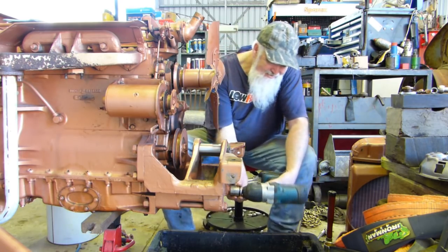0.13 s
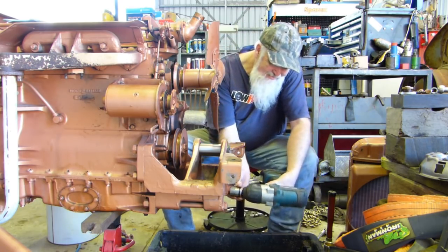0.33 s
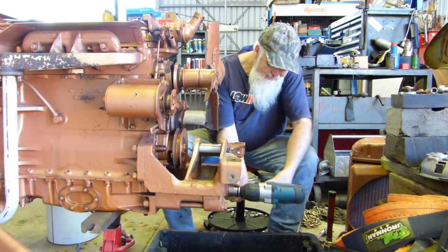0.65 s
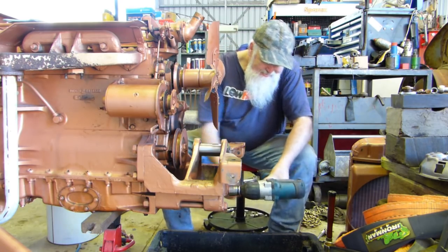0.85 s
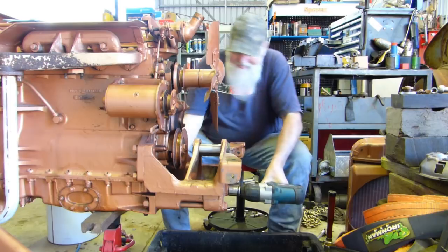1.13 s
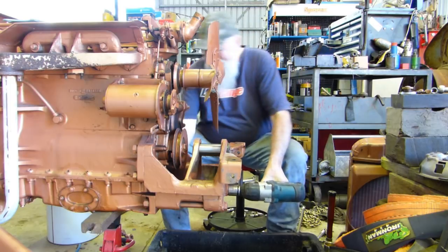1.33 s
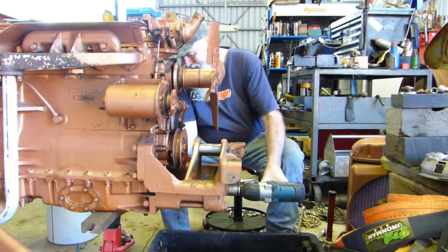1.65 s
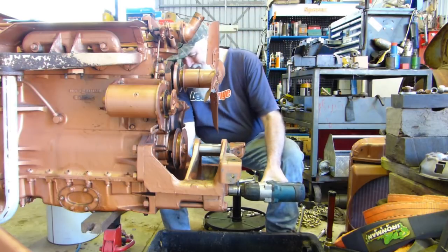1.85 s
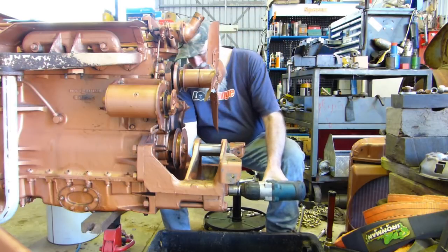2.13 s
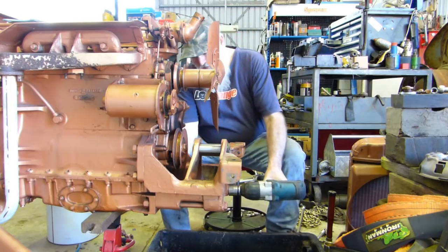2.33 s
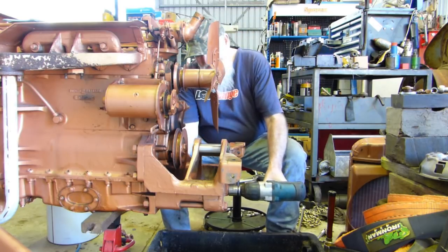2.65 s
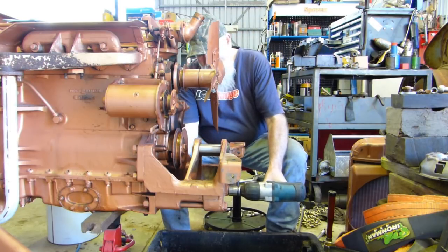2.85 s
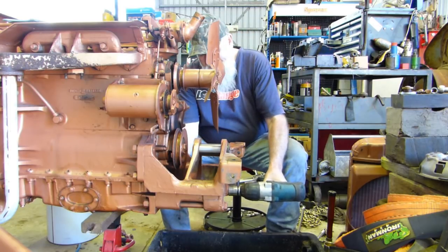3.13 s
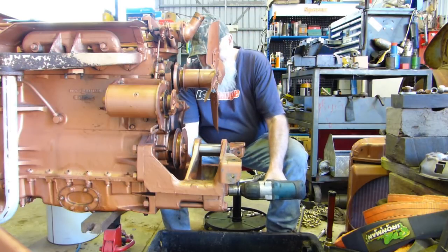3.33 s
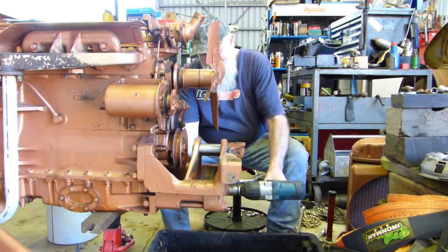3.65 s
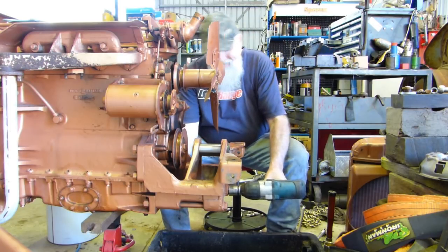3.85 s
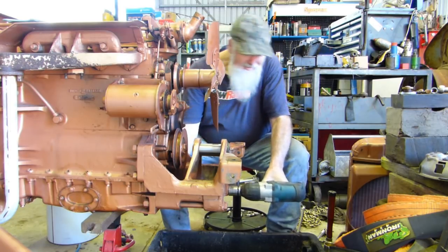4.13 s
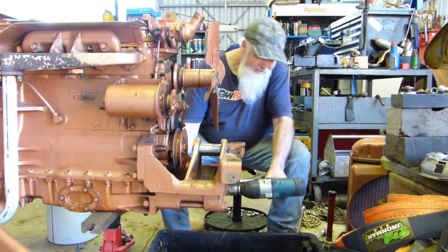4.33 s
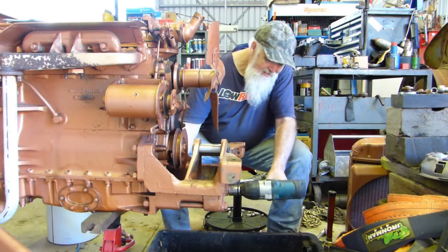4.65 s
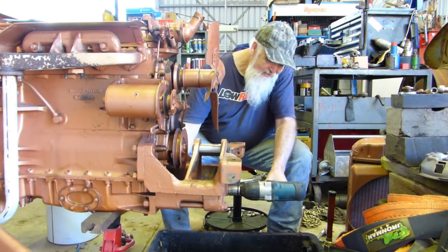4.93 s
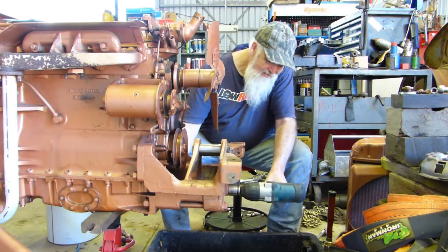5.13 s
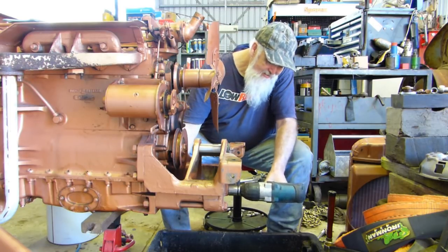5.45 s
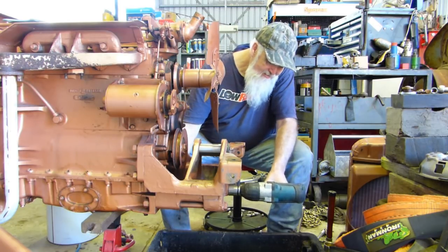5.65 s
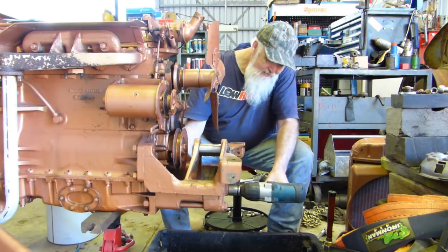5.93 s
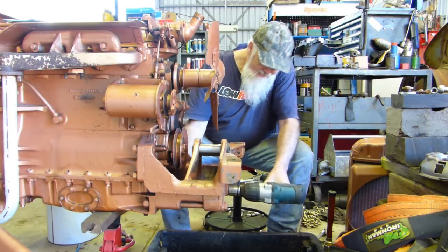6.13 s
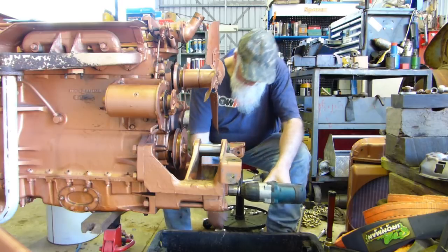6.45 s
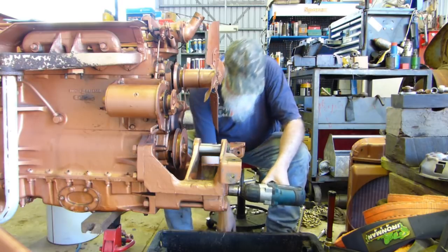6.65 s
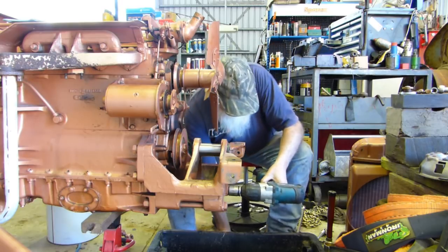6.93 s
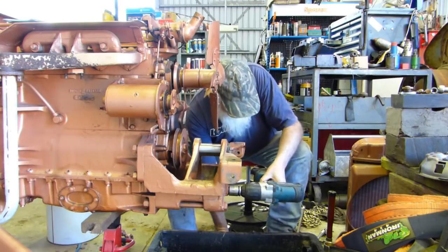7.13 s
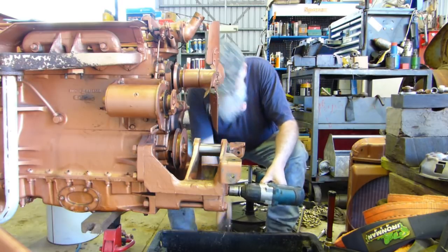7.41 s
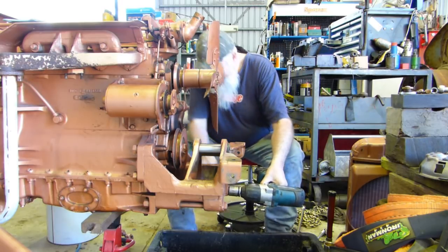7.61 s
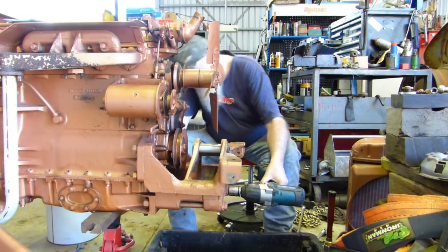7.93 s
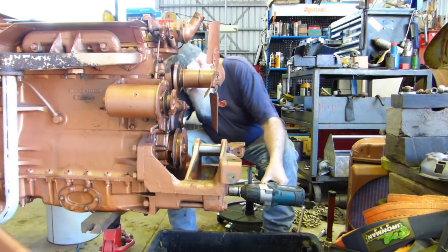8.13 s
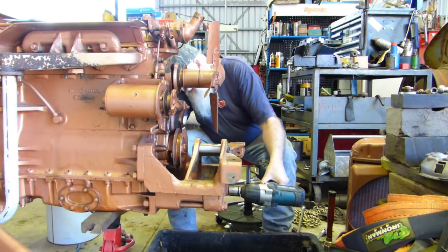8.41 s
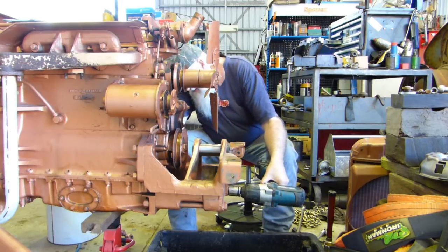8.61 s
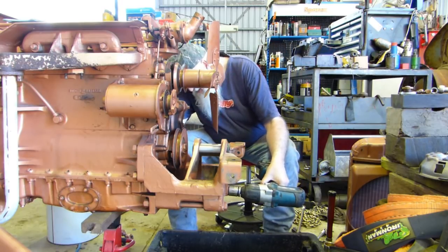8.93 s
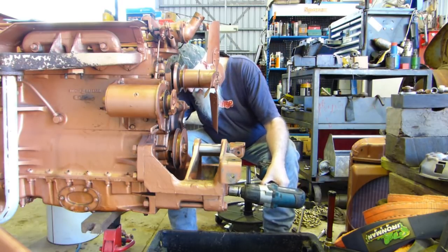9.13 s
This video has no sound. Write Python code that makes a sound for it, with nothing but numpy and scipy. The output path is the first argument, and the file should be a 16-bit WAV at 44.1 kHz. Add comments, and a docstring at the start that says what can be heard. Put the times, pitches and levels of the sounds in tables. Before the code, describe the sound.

Close stereo microphone, slightly clipped by the loudest blows, in a reverberant metal shed. Quiet creaking, rustling and small ticks come first, with a double knock on a heavy casting. A wrench trigger clicks and rapid metallic blows hammer over gear noise, with a brief hitch, then grow uneven and die. Quiet air follows, with barely audible creaks and finally two separate clinks of a steel bar.

```python
"""An impact wrench hammers at a tight bolt in a cast-iron block inside a sheet-metal shed, falters and stops:
each blow is a crack of banded noise that rings the modes of socket and block, over a bed of gear noise.
Before it a seat creaks in uneven slips, a tool knocks on the casting and clothes shuffle in noise swells;
after it the seat creaks again, a steel bar is clinked twice, a small part rings and something hollow is bumped.
Hum sines and noisy background air lie underneath; they sink when the hammering starts and creep back."""
import sys
import numpy as np
from scipy import signal
from scipy.fft import rfft, irfft
from scipy.io import wavfile
from scipy.ndimage import uniform_filter1d

SR = 44100
rng = np.random.default_rng(int(sys.argv[2]) if len(sys.argv) > 2 else 0)


def unload_wav(signal):
    """Save mono or channel-first audio to the path in sys.argv[1] as 16-bit WAV at rate SR, clipped to [-1, 1]."""
    wavfile.write(
        sys.argv[1],
        SR,
        np.round(np.clip(np.atleast_2d(signal).T, -1, 1) * 32767).astype(np.int16),
    )


N = 409248


def from_db(db):
    """Gain of a level."""
    return 10 ** (np.asarray(db) / 20)


def rms_one(x):
    """Scale to rms 1."""
    return x / np.sqrt(np.mean(x ** 2) + 1e-20)


def in_time(rows, column=1):
    """One column of a curve at every sample; near silence outside its span."""
    rows = np.array(rows)
    return np.interp(np.arange(N) / SR, rows[:, 0], rows[:, column], left=-150, right=-150)


def at_hz(points, hz):
    """Read a table on a log-frequency axis."""
    points = np.array(points)
    return np.interp(np.log(hz), np.log(points[:, 0]), points[:, 1])


def force_db(events, hz, middle_hz):
    """Strength of each event at one pitch: middle level up to middle_hz, treble level from an octave above."""
    events = np.array(events)
    treble = np.clip(np.log2(hz / middle_hz), 0, 1)
    return treble * events[:, 1] + (1 - treble) * events[:, 2]


def train(times, sizes):
    """Clicks of given sizes at given times."""
    clicks = np.full(N, 1e-18)
    clicks[(np.asarray(times) * SR).astype(int)] = sizes
    return clicks


def ring(clicks, hz, t60):
    """A two-pole resonator: a unit click sets a decaying sine of starting height 1 ringing."""
    radius, angle = from_db(-60 / (t60 * SR)), 2 * np.pi * hz / SR
    return signal.lfilter([0, np.sin(angle)], [1, -2 * radius * np.cos(angle), radius * radius], clicks)


T60_TIMES_WIDTH = np.log(1000) / np.pi   # a resonance's t60 in s times its width in Hz
BAND_EDGES_HZ = 25 * 2 ** (np.arange(29) / 3)


def bands(length):
    """Third-octave bands of noise as (centre Hz, mid, side); neighbours are unrelated."""
    white = rng.standard_normal((2, 2, length))
    for k, (low, high) in enumerate(zip(BAND_EDGES_HZ, BAND_EDGES_HZ[1:])):
        band = signal.butter(2, [low, high], "band", fs=SR, output="sos")
        mid, side = signal.sosfilt(band, white[k % 2])
        yield np.sqrt(low * high), mid, side


def spread(hz, mid, side, likeness):
    """Left and right of a band, from mid and side weighted by how alike the two channels are."""
    alike = np.clip(at_hz(likeness, hz), 0, 1)
    return np.sqrt(1 + alike) * mid + np.sqrt(1 - alike) * side * [[1], [-1]]


def bursts(kinds, t60s, hz, vary_db, rise_s):
    """Envelope of one band: every event rises fast and dies, with a colour of its own."""
    clicks = 0
    for events, colour in kinds:
        level_db = force_db(events, hz, 2237) + at_hz(colour, hz) + rng.normal(0, vary_db, len(events))
        clicks = clicks + train(np.array(events)[:, 0], from_db(level_db))
    fall = from_db(-60 / (at_hz(t60s, hz) * SR))
    rise = np.exp(-1 / (rise_s * SR))
    return signal.lfilter([1 - rise], np.convolve([1, -fall], [1, -rise]), clicks)


CONTACT_S = 0.0022   # a ring builds up while the parts touch


def struck(events, modes, level_db):
    """Each blow sets every mode ringing; the ring wavers irregularly in level."""
    s = np.array(events)[:, 0]
    out, span = np.zeros(N), slice(int(s[0] * SR), int((s[-1] + 1) * SR))
    for hz, *mode_db, t60 in modes:
        sizes_db = force_db(events, hz, 920) + level_db + np.array(mode_db)
        sizes_db = sizes_db + rng.normal(0, 0.4, len(events))
        clicks = train(s, from_db(sizes_db))[span]
        step = np.arange(len(clicks)) / 220   # a fresh waver level every 220 samples
        levels = rng.normal(0, min(hz / 400, 6), int(np.ceil(step[-1] + 2)))
        waver_db = np.interp(step, np.arange(step[-1] + 2), levels)
        build_up = ring(clicks, hz, min(t60 / 2, np.log(1000) * CONTACT_S))
        out[span] += (ring(clicks, hz, t60) - build_up) * from_db(waver_db)
    return out


def swells(rows):
    """Gain of sounds that rise to a top and fade, in straight lines of dB."""
    t = np.arange(0, N / SR + .001, .0005)
    gain = sum(from_db(db - np.where(t < s, rise * (s - t), fall * (t - s))) for s, db, rise, fall in rows)
    return np.interp(np.arange(N) / SR, t, gain)


MOTOR_ON_S, MOTOR_OFF_S, GEARS_DB = 2.225, 6.25, -40.5   # gears' level before colour
RUN_UP_DB, RUN_UP_S, RUN_DOWN_DB_PER_S = -10.5, 0.11, 370


def motor():
    """Gain of the gear noise between the blows: on at the switch, up to speed, running down at the end."""
    t = np.arange(N) / SR
    run_up_db = RUN_UP_DB * np.exp(-np.abs(t - MOTOR_ON_S) / RUN_UP_S)
    run_down_db = RUN_DOWN_DB_PER_S * np.maximum(t - MOTOR_OFF_S, 0)
    return from_db(GEARS_DB + run_up_db - run_down_db) * (t > MOTOR_ON_S)


# hammer on anvil, one run of blows that falters twice: start_s, treble_db, middle_db (before colour)
BLOWS = [(2.2523, -2.5, -15.5), (2.2911, -3, -20), (2.3231, -7.5, -17.5), (2.3541, -11.5, -27.5),
         (2.383, -9, -17.5), (2.413, -9.5, -20.5), (2.4425, -8.5, -26.5), (2.472, -8, -18),
         (2.5022, -7, -27.5), (2.5313, -9.5, -32.5), (2.5612, -10, -23), (2.591, -7.5, -22.5),
         (2.621, -9, -21.5), (2.6515, -10.5, -19), (2.6814, -6, -29.5), (2.7081, -11, -26.5),
         (2.7384, -9, -24.5), (2.7677, -9.5, -21), (2.797, -6.5, -20.5), (2.826, -6, -23.5),
         (2.8557, -8.5, -20), (2.8854, -9.5, -26.5), (2.9129, -6, -22.5), (2.9426, -9, -23),
         (2.9722, -10, -21.5), (3.0011, -9.5, -18), (3.0296, -5, -19), (3.06, -9, -22), (3.088, -8.5, -24),
         (3.1172, -8.5, -29), (3.147, -8, -18.5), (3.1736, -8, -28), (3.2039, -8, -24),
         (3.2324, -7.5, -25.5), (3.2611, -9, -19), (3.29, -7, -21.5), (3.3186, -5.5, -28.5),
         (3.347, -8, -20), (3.3753, -6.5, -28.5), (3.4042, -8, -22.5), (3.4325, -8, -24),
         (3.461, -7, -22.5), (3.4892, -7, -23.5), (3.5183, -7, -22), (3.5484, -9.5, -20.5),
         (3.5763, -7, -21.5), (3.6054, -9, -19), (3.6342, -8, -20), (3.6658, -10.5, -18.5),
         (3.693, -5.5, -24), (3.722, -7, -21.5), (3.7525, -6.5, -21.5), (3.7807, -7.5, -26.5),
         (3.8104, -4.5, -19.5), (3.8383, -10, -22.5), (3.8674, -8, -23), (3.8972, -8, -20),
         (3.9246, -7, -24), (3.953, -6, -16.5), (3.9845, -9.5, -20), (4.0128, -6, -24), (4.0412, -9.5, -24),
         (4.0723, -7.5, -19), (4.1006, -6.5, -25.5), (4.1294, -6.5, -20), (4.161, -9.5, -20.5),
         (4.191, -5.5, -19), (4.2174, -19.5, -30), (4.238, -6, -20.5), (4.2649, -17, -31.5),
         (4.3086, -16, -20.5), (4.3351, -12.5, -20), (4.4058, -7.5, -18), (4.4373, -4, -16.5),
         (4.472, -7.5, -20), (4.5026, -6, -20.5), (4.5318, -7, -17), (4.5634, -6.5, -18.5),
         (4.593, -8, -20.5), (4.6225, -5.5, -22), (4.6503, -5, -16.5), (4.6796, -7.5, -22.5),
         (4.7113, -7.5, -18.5), (4.7387, -8.5, -20.5), (4.769, -6.5, -21.5), (4.798, -9, -26.5),
         (4.8271, -7, -18), (4.8562, -7, -23), (4.8836, -5, -22), (4.9121, -8, -24), (4.94, -8.5, -17.5),
         (4.9673, -8, -23), (4.9973, -9, -18), (5.0233, -7.5, -21.5), (5.053, -7, -23.5),
         (5.081, -5.5, -21), (5.1086, -8, -22), (5.1364, -7.5, -22), (5.1653, -5, -24.5),
         (5.1924, -8.5, -26), (5.2213, -9, -21), (5.2478, -9.5, -21.5), (5.276, -11, -20.5),
         (5.3033, -9, -21.5), (5.3301, -9, -15), (5.3595, -13, -22.5), (5.3876, -8, -20.5),
         (5.415, -9, -25.5), (5.4428, -8, -21.5), (5.4706, -11, -22.5), (5.5002, -11.5, -19),
         (5.5263, -9, -19.5), (5.5542, -10, -32.5), (5.5829, -11.5, -16.5), (5.6099, -9, -37),
         (5.6388, -12.5, -18.5), (5.669, -8.5, -27), (5.702, -15, -20), (5.738, -11, -21.5),
         (5.7783, -13, -18.5), (5.8174, -12, -27.5), (5.8593, -14, -18), (5.919, -11.5, -19),
         (6.0161, -7.5, -16), (6.061, -10, -16), (6.1099, -11, -17), (6.155, -11.5, -21.5), (6.2, -18, -22),
         (6.2705, -16, -26.5), (6.2913, -24, -23.5), (6.324, -26, -28)]
# click of the switch: start_s, treble_db, middle_db
TRIGGER = [(2.2212, -21, -28)]
# the hammer bounces back on the anvil: start_s, treble_db, middle_db
BOUNCES = [(2.281, -16, -20.5), (6.211, -21, -32)]
# tone of the cracks and the gears: pitch_hz, level_db (per Hz, relative)
BLOW_COLOUR = [(28, -11), (70, -19), (230, -16), (450, -13.5), (850, -8.5), (1150, -4), (1800, 1.5),
               (3300, -8), (5000, -13), (6500, -8.5), (9000, -10.5), (11500, -15), (13900, -20.5),
               (16300, -33)]
# how long the cracks last: pitch_hz, t60_s
BLOW_T60 = [(100, 0.092), (500, 0.055), (2000, 0.03), (6000, 0.03), (14000, 0.013)]
# how alike left and right are up close: pitch_hz, likeness (0-1)
CLOSE_LIKENESS = [(50, 0.03), (300, 0.6), (1500, 0.7), (5000, 0.4), (14000, 0.6)]


def cracks_and_gears():
    """Close stereo noise in bands: a burst for each blow, click and bounce, over the steady gears."""
    out, gears = np.zeros((2, N)), motor()
    kinds = [(BLOWS, BLOW_COLOUR), (TRIGGER + BOUNCES, BLOW_COLOUR)]
    for hz, mid, side in bands(N):
        blows = from_db(6.5) * bursts(kinds, BLOW_T60, hz, vary_db=2.0, rise_s=0.0019)
        gear_noise = gears * from_db(at_hz(BLOW_COLOUR, hz) + 6.5)
        out += spread(hz, mid, side, CLOSE_LIKENESS) * (blows + gear_noise)
    return out


# resonances of socket, bolt and block, whose grip shifts as the work goes on:
# pitch_hz, width_hz, early_db, midway_db, late_db (relative)
SOCKET = [(509.4, 41, 1.5, -1, 0), (584.7, 27, -8.5, -12.5, -1.5), (761.6, 31, -1, -9.5, -2),
          (945, 30, -2.5, -8.5, 2), (1016, 50, -3.5, -0.5, 6), (1503, 78, 3, 10, 10.5),
          (1739, 84, -2, 15.5, 1.5), (1990, 65, -4, 4, -2.5), (2300, 170, 10, 9.5, 1),
          (2516, 37, -1, -2.5, -1), (3100, 35, -21, -11.5, -6.5), (3627, 33, -17, -13.5, -9.5),
          (4032, 90, -9.5, -8, -0.5), (4862, 140, -3.5, -2.5, 5), (5491, 44.1, -18, -10, -9),
          (5834, 240, 5, -9.5, -0.5), (6200, 71, -3, -9, -7.5), (7267, 190, 2, 5, -0.5),
          (7790, 160, 5.5, 1.5, -2.5), (8430, 130, -6.5, -5, -2), (9060, 180, 10.5, 3.5, 2),
          (9860, 460, 8.5, -2.5, -6), (10830, 150, -2, -10.5, -12), (11224, 37, -13, -9, -13.5)]
# when the early, midway and late grips hold: time_s
GRIP_S = [2.6, 4.0, 5.3]


def socket_ring():
    """Each blow rings socket and block; the low modes repeat evenly, so the blow rate shows as lines."""
    hits = np.array(BLOWS)
    s, out = hits[:, 0], np.zeros(N)
    span = slice(int(s[0] * SR) - 200, int((s[-1] + .5) * SR))
    # the beat of the turning hammer, where it runs steadily
    even = uniform_filter1d(uniform_filter1d(s, size=7), size=7)
    even = np.where(np.abs(even - s) < .002, even, s)
    for hz, width, *levels_db in SOCKET:
        uneven = np.clip(np.log2(hz / 800), 0, 1)   # 0 for low modes, 1 from 1600 Hz
        t60 = T60_TIMES_WIDTH / width
        blow_db = force_db(hits, hz, 2200)
        blow_db += np.interp(s, [5.6, 6.2], [0, -14])   # the loosened bolt rings less
        blow_db = uneven * blow_db + (1 - uneven) * uniform_filter1d(blow_db, size=9)
        blow_db += np.interp(s, GRIP_S, levels_db) - 9.5
        blow_db += uneven * rng.normal(0, 3.5, len(s))
        times = even + uneven * (s - even + rng.uniform(0, .002, len(s)))
        clicks = train(times, from_db(blow_db))[span]
        out[span] += ring(clicks, hz, t60) - ring(clicks, hz, 0.28 * t60)   # the ring swells for a moment
    return out


# slack in the socket: pitch_hz, level_db (relative), t60_s
TAKE_UP = [(876, 2, 0.033), (1046, 4.5, 0.032), (1130, -1.5, 0.028)]


def socket_slack():
    """The first two blows take up the slack and ring three low modes of the socket."""
    return struck(np.array(BLOWS)[:2], TAKE_UP, level_db=1.0)


# steel bar struck: start_s, treble_db, middle_db
CLINKS = [(8.3775, -27, -23), (8.9665, -25, -29.5)]
# modes of the bar, struck at two spots: pitch_hz, first_clink_db, second_clink_db, t60_s
BAR = [(689, -2, -14, 0.26), (824, -10, -22, 0.15), (1340, -11, -14, 0.1), (1690, -10, -7, 0.12),
       (2360, -16, -8, 0.08), (2541, -2, -1, 0.14), (2573, 1, -3, 0.17), (4160, -2, -10, 0.24),
       (4233, -7, 1, 0.15), (5460, -12, -13, 0.08), (6550, -7, -9, 0.14), (6700, -5, -15, 0.11),
       (8732, -12, -9, 0.08), (10850, -5, -18, 0.07), (11250, -5, -14, 0.08)]
# the bar still rings as the scene opens: start_s, treble_db, middle_db
FADING_CLINK = [(.001, -39, -56)]


def bar_ring():
    """Two clinks ring all modes of the bar; a faint one at the start rings only its lower modes."""
    first_spot = np.delete(BAR[:9], 2, axis=1)   # without second_clink_db
    return struck(CLINKS, BAR, level_db=-8.0) + struck(FADING_CLINK, first_spot, level_db=-10.0)


# a smaller part touched on the rebound: start_s, treble_db, middle_db
REBOUND = [(9.04, -25.5, -38)]
# its modes: pitch_hz, level_db (relative), t60_s
SMALL_PART = [(5200, -8, 0.026), (7950, -2, 0.06), (8100, 1, 0.05), (8400, -3, 0.04)]


def small_part_ring():
    """One light touch rings a few high, short modes."""
    return struck(REBOUND, SMALL_PART, level_db=-8.5)


# something hollow under the bar is bumped: start_s, treble_db, middle_db
THUDS = [(8.9685, -35, -34.5), (9.086, -55, -35)]
# its modes: pitch_hz, level_db (relative), t60_s
HOLLOW = [(641, -1.5, 0.11), (1240, 2.5, 0.13), (1710, -15, .06)]


def hollow_thuds():
    """Two bumps ring three modes of a hollow body."""
    return struck(THUDS, HOLLOW, level_db=-6)


# tool set down on the casting: start_s, treble_db, middle_db
KNOCKS = [(0.5576, -25, -29), (0.5764, -24.5, -22), (.5836, -36, -36)]
# modes of the casting: pitch_hz, level_db (relative), t60_s
CASTING = [(390, -1.5, 0.11), (520, 0.5, 0.06), (1280, -12, 0.1), (1370, 0, 0.054), (1720, -12, 0.035),
           (2270, 9, 0.024), (2335, 2, 0.062), (3700, -6, 0.025), (4097, -1, 0.052)]


def casting_ring():
    """The tool's knocks ring the short modes of the cast iron."""
    return struck(KNOCKS, CASTING, level_db=-9.5)


# small ticks: start_s, treble_db, middle_db
TICKS = [(.212, -30, -60), (0.392, -27, -34), (.542, -40, -60), (.768, -41, -57), (0.9453, -26.5, -58),
         (1.26, -25.5, -68), (1.7779, -29.5, -60.5), (1.9175, -28, -54), (1.9629, -30.5, -45)]
# tone of the knocks: pitch_hz, level_db (per Hz, relative)
KNOCK_COLOUR = [(59, -52.5), (100, -36), (302, -9), (343, -28), (381, -17), (1080, 0), (1420, -3),
                (2370, 0.5), (4300, -8.5), (9820, -29), (16000, -67)]
# tone of the clinks and the rebound: pitch_hz, level_db (per Hz, relative)
CLINK_COLOUR = [(200, -24), (450, -11), (700, -18), (1100, -1), (1900, 0), (3000, -4.5), (8000, -10),
                (12000, -28), (15000, -58)]
# how long this noise lasts: pitch_hz, t60_s
KNOCK_T60 = [(200, 0.11), (1000, 0.069), (4000, 0.025), (12000, 0.06)]


def contact_noise():
    """Mono noise bursts in bands where parts meet: knocks, clinks, rebound and small ticks."""
    out = np.zeros(N)
    kinds = [(KNOCKS, KNOCK_COLOUR), (CLINKS + REBOUND, CLINK_COLOUR), (TICKS, SHUFFLE_COLOUR)]
    for hz, _, side in bands(N):
        out += side * from_db(9.5) * bursts(kinds, KNOCK_T60, hz, rise_s=0.0068, vary_db=5.5)
    return out


# resonances of the seat: pitch_hz, width_hz, level_db (relative)
SEAT = [(438, 79, -22.5), (574, 61, -7), (771.4, 18, -3), (805, 25, -5), (903, 22, -8), (1456, 150, -4.5)]
# spells of creaking: loudest_s, level_db (relative), rise_db_per_s, fall_db_per_s
CREAKS = [(0.0, -19.5, 298.5, 196), (0.08, -22.5, 511, 93), (0.33, -28, 644, 900), (0.39, -50, 400, 90),
          (1.766, -47.5, 241, 245.5), (7.0, -61, 302, 42), (7.19, -57, 23.5, 140), (7.38, -46, 100, 400),
          (7.44, -52, 230, 135)]
# the strongest slips: time_s, peak_db, pitch_hz
SLIPS = [(0.082, -33, 757), (0.119, -27, 824), (0.164, -25.5, 787), (0.263, -34.5, 833), (0.323, -27, 832),
         (0.383, -35, 824), (6.994, -57, 763), (7.019, -54, 767), (7.059, -53, 804), (7.205, -54, 834),
         (7.292, -50, 789), (7.342, -48, 863), (7.37, -46, 803), (7.439, -48, 904), (7.466, -53, 865)]
RUN_S = 0.0214   # length of a strong slip's run


def seat_creak():
    """Uneven slips of a dry joint shake the seat's resonances; the strongest are short runs with a pitch."""
    sizes = from_db(5 * np.minimum(rng.exponential(1, N), 1.5)) * rng.choice([-1, 1], N)
    slips = sizes * (rng.random(N) < 900 / SR) + 1e-18   # about 900 slips a second
    out = rms_one(sum(from_db(db) * ring(slips, hz, T60_TIMES_WIDTH / width) for hz, width, db in SEAT))
    out *= from_db(-9.5) * swells(CREAKS)
    t = np.arange(int(RUN_S * SR)) / SR
    for s, peak_db, hz in SLIPS:
        run = from_db(peak_db) * np.hanning(len(t)) * np.sin(2 * np.pi * hz * t)
        out[int((s - RUN_S / 4) * SR):][:len(t)] += run
    return out


# a faint low tone that comes and goes: start_s, length_s, pitch_hz, level_db
LOW_TONES = [(4.493, 0.27, 238, -51), (5.508, 0.23, 231, -53.5)]
TONE_EDGE_DB_PER_S = 288


def low_tone():
    """Sines that fade in, hold and fade out."""
    t = np.arange(N) / SR
    out = np.zeros(N)
    for s, length, hz, db in LOW_TONES:
        outside_s = np.maximum(np.maximum(s - t, t - s - length), 0)
        out += np.sqrt(2) * from_db(db - TONE_EDGE_DB_PER_S * outside_s) * np.sin(2 * np.pi * hz * t)
    return out


# decay of the shed: pitch_hz, t60_s
SHED_T60 = [(100, 0.39), (500, 0.83), (2000, 0.69), (4000, 0.8), (8000, 0.3), (14000, 0.53)]
# how alike left and right are in diffuse sound: pitch_hz, likeness (0-1)
LIKENESS = [(50, .3), (300, 0.2), (1500, 0.6), (5000, 1), (14000, 0.5)]
WALL_ECHO_S, WALL_ECHO_DB = .03, -14   # level relative, like the tail's


def shed(x):
    """Diffuse tail dying band by band, with the return from a far wall as a fresh start."""
    t = np.arange(SR) / SR
    echo = np.where(t > WALL_ECHO_S, from_db(WALL_ECHO_DB) * np.exp(-(t - WALL_ECHO_S) / 0.0081), 0)
    response = np.zeros((2, SR))
    for hz, mid, side in bands(SR):
        if hz > 180:
            tail = from_db(-13.5 - 60 * t / at_hz(SHED_T60, hz))
            response += spread(hz, mid, side, LIKENESS) * (tail + echo)
    response *= 1 - np.exp(-t / 0.0012)   # the first reflections need time to arrive
    paths = rfft(response)
    power = np.abs(paths) ** 2   # so many paths that no narrow band stands out
    paths *= np.sqrt(uniform_filter1d(power, size=500) / uniform_filter1d(power, size=14))
    response = irfft(paths)[:, :SR * 9 // 10]
    return signal.fftconvolve(x[None], response * from_db(-23.0), axes=1)[:, :N]


# clothes and shoes shuffling: loudest_s, level_db (before colour), rise_db_per_s, fall_db_per_s
SHUFFLES = [(0.0, -32.5, 298, 41), (0.956, -53, 650, 25), (1.106, -53, 65, 96), (1.266, -56, 704, 29),
            (1.812, -54, 97, 83), (1.922, -46.5, 999.5, 76), (6.996, -71, 351, 135), (7.38, -68, 57, 21),
            (8.03, -69, 229, 349.5)]
# tone of the shuffling and the ticks: pitch_hz, level_db (per Hz, relative)
SHUFFLE_COLOUR = [(88, -41.5), (150, -15), (264, -14.5), (297, -7), (354, -15), (774, -7.5), (6260, -22),
                  (9820, -29), (16000, -49.5)]
# background levels: time_s, air_db, hum_db (both before colour)
BACKGROUND = [(0, -61, -58.5), (2.2, -52.5, -58.5), (2.3, -67.5, -78), (6.8, -59.5, -79), (8.3, -59, -71),
              (9.28, -50.5, -61)]
# tone of the air: pitch_hz, level_db (relative)
AIR = [(25, -19.5), (60, -25.5), (150, -27.5), (400, -25), (1000, -28.5), (3500, -41), (5500, -40.5),
       (11000, -43.5), (16000, -57.5)]


def shuffling_and_air():
    """Diffuse noise in bands: shuffles over background air, which sinks as hammering starts and creeps back."""
    out = np.zeros((2, N))
    shuffle, air = swells(SHUFFLES), from_db(in_time(BACKGROUND))
    for hz, mid, side in bands(N):
        levels = shuffle * from_db(at_hz(SHUFFLE_COLOUR, hz) + 11.5) + air * from_db(at_hz(AIR, hz) + 26.0)
        out += spread(hz, side[::-1], mid[::-1], LIKENESS) * levels
    return out


# lines of the hum: pitch_hz, level_db (relative)
HUM = [(200, -23.5), (300.7, -3)]


def hum():
    """Sines at or near multiples of the mains, from a machine somewhere in the shed."""
    t = np.arange(N) / SR
    lines = sum(from_db(db) * np.sqrt(2) * np.sin(2 * np.pi * (hz * t + rng.random())) for hz, db in HUM)
    return lines * from_db(in_time(BACKGROUND, column=2))


def scene():
    """Sources with the shed's answer, stronger for the knocks further back, then the diffuse background."""
    cracks, knocks = cracks_and_gears(), contact_noise()
    steel = bar_ring() + small_part_ring() + casting_ring() + hollow_thuds()
    solid = socket_ring() + socket_slack() + seat_creak()
    above_300 = signal.butter(4, 300, "high", fs=SR, output="sos")   # keep the rings above 300 Hz
    steel, solid = signal.sosfilt(above_300, [steel, solid])
    near = cracks + knocks + solid + steel + hum() + low_tone()
    near = near * from_db([[.45], [-.45]])   # slightly to the left
    to_shed = cracks.mean(axis=0) + from_db(-4.0) * solid + from_db(2.0) * steel + from_db(1.5) * knocks
    return near + shed(to_shed) + shuffling_and_air()


CUTOFF_HZ, OFFSET = 16500, -.0028   # offset in parts of full scale


def record(dry):
    """The highest peaks are clipped, the top is cut; the converter adds a small offset."""
    cut = signal.cheby2(14, 90, CUTOFF_HZ, fs=SR, output="sos")
    return signal.sosfilt(cut, np.clip(dry, -.82, .82)) + OFFSET


dry = scene()
out = record(dry)
unload_wav(out)
```